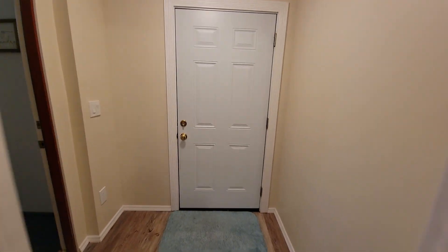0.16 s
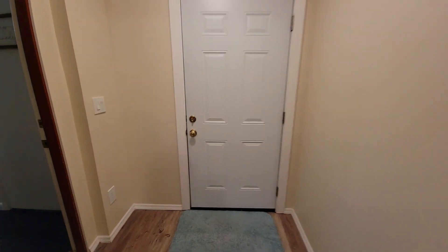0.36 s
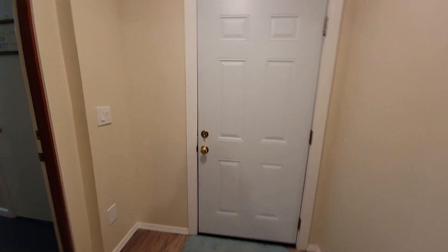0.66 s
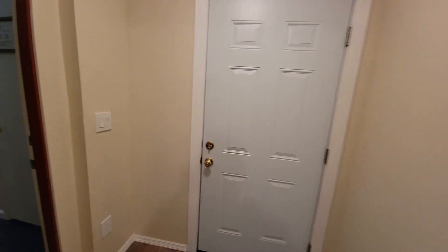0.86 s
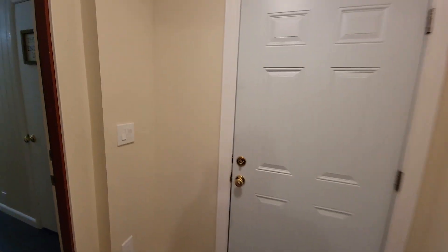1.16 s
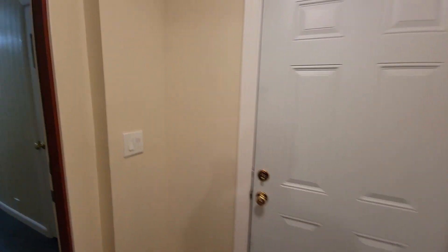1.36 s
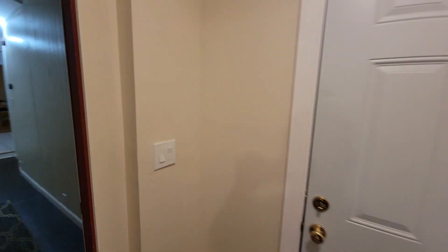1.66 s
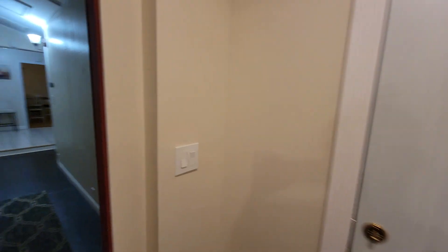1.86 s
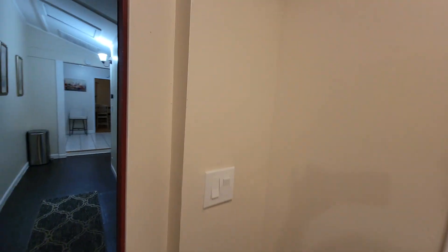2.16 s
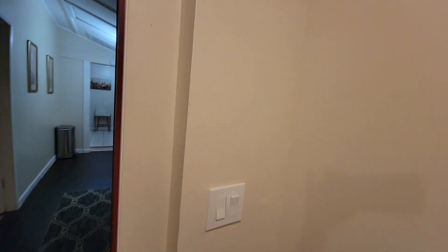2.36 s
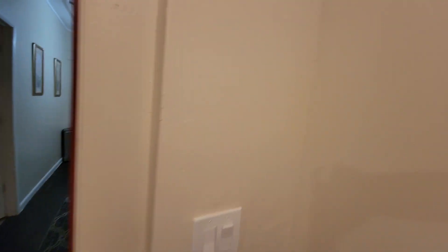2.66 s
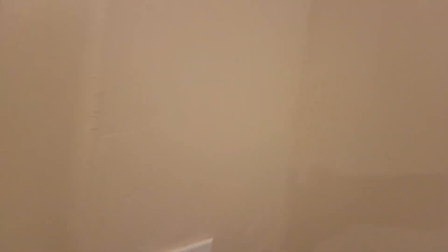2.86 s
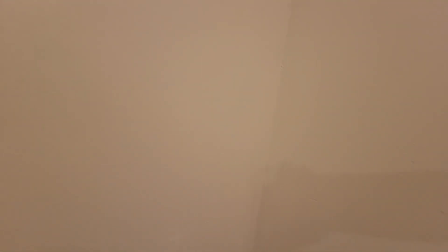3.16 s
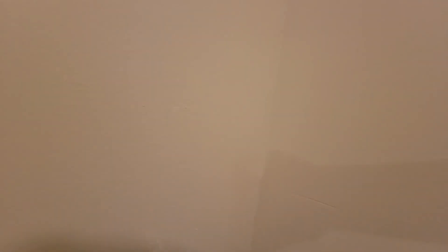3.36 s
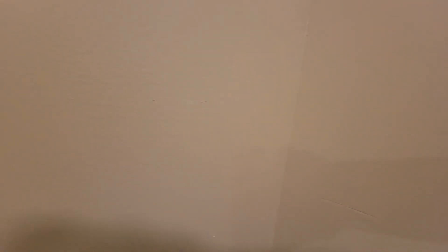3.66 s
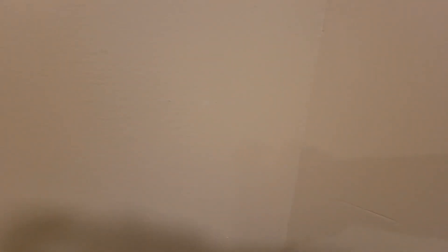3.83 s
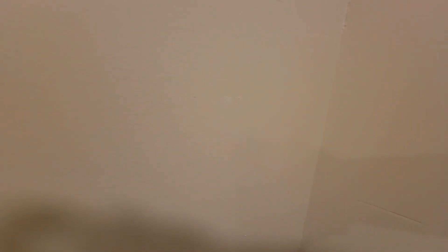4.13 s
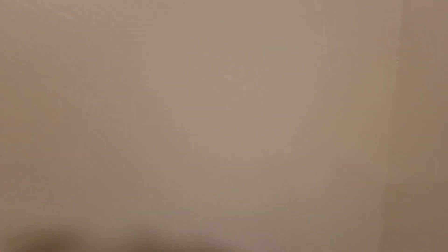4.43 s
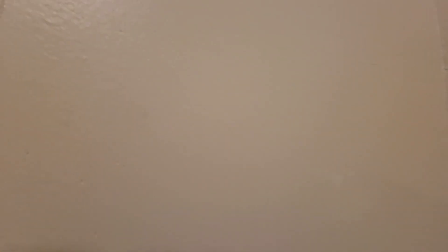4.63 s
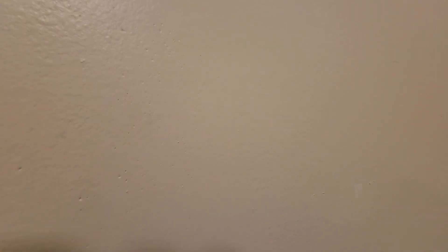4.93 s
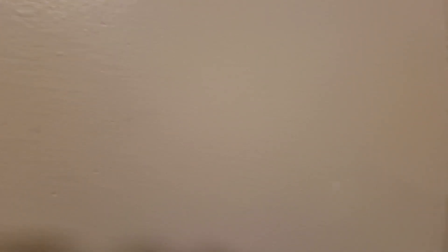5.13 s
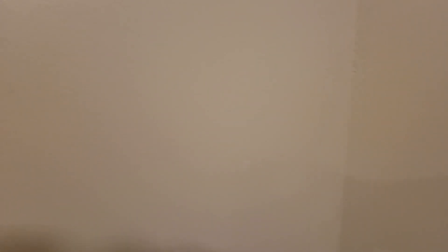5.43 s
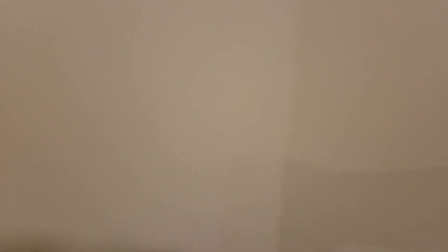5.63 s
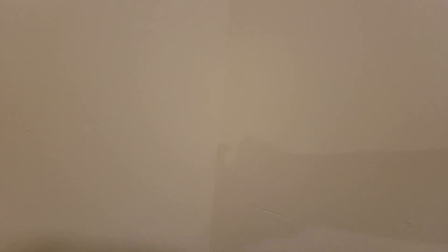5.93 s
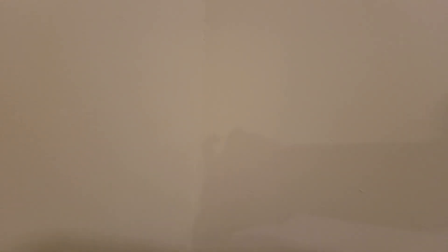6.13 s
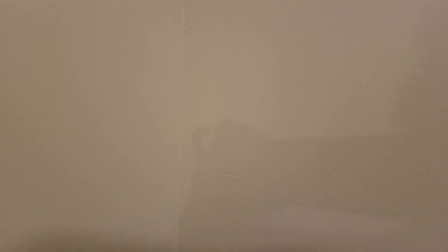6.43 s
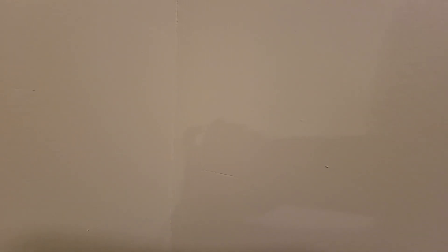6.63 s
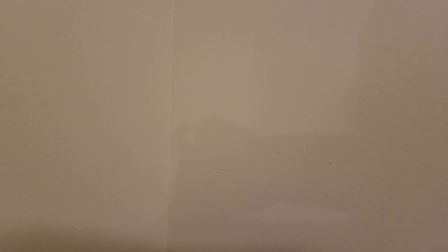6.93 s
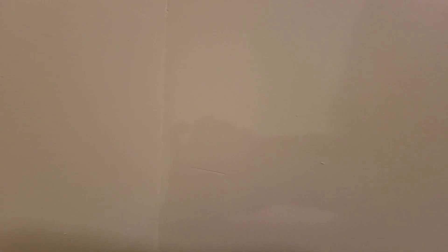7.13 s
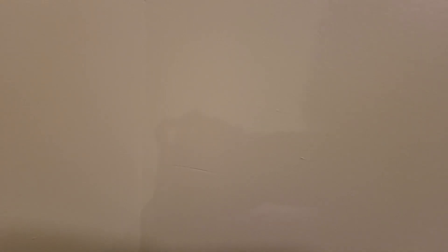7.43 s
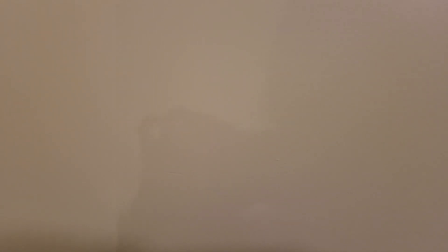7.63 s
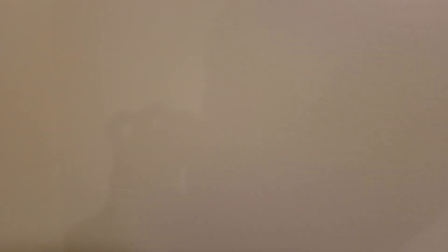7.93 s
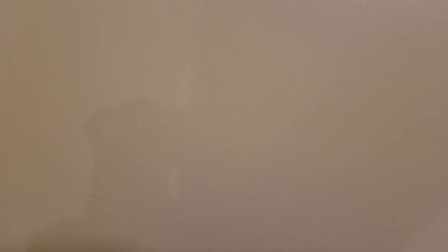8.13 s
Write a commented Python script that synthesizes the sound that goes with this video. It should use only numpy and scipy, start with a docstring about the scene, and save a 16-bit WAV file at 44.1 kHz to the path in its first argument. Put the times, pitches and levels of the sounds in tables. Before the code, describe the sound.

Soft footsteps cross a hard hallway floor, a hand wipes and taps the wall, a bolt snaps, a latch clicks, and a door bangs loudly.

```python
"""A quiet house hum runs throughout. Soft steps thud, pop and scuff over a hard floor in a small hallway,
as filtered noise and short sinking notes, while a hand taps and wipes the wall with dry cracks and grainy noise.
A sleeve brushes past, then a bolt snaps, a knob is knocked and a latch springs: noise cracks with ringing sines.
The door drags and snaps in its frame and bangs at the end with a boom of sines and a dying noise crack.
Two close microphone ports hear the lows alike, and higher sounds both directly and through the hall."""
import sys
import numpy as np
from scipy import signal
from scipy.io import wavfile

SR = 44100
rng = np.random.default_rng(int(sys.argv[2]) if len(sys.argv) > 2 else 0)


def volts_from_db(level):
    """Convert decibel levels to linear amplitude ratios."""
    exponent = np.asarray(level, float) / 20
    return 10 ** exponent


def waveform_to_disk(signal):
    """Save audio, clipped to [-1, 1], as 16-bit WAV at the path in sys.argv[1]."""
    frames = np.transpose(np.atleast_2d(signal))
    scaled = np.clip(frames, -1, 1) * 32767
    samples = np.round(scaled).astype(np.int16)
    wavfile.write(sys.argv[1], SR, samples)


N = 365588      # length in samples

# In the tables t60 is the time a sound takes to die by 60 dB.


def rms_one(x):
    """Scale a sound so that its average strength (rms) is 1."""
    return x / np.sqrt(np.mean(x ** 2) + 1e-20)


def at_hz(points, hz):
    """Read a table of (f/Hz, value) between its points, on a log-frequency axis."""
    table_hz, values = np.array(points).T[:2]
    return np.interp(np.log(hz), np.log(table_hz), values)


def in_time(rows):
    """Follow a curve of (t/s, level/dB) as a gain, practically silent outside its span."""
    s, level_db = np.transpose(rows)
    return volts_from_db(np.interp(np.arange(N) / SR, s, level_db, left=-140, right=-140))


def cut(x, hz, kind, order=2):
    """Keep only the lows, the highs or a band, with a smooth (Butterworth) filter."""
    return signal.sosfilt(signal.butter(order, hz, kind, fs=SR, output="sos"), x + 1e-18)


def ring(x, hz, t60):
    """Let each click start a dying sine, of height about 1 for a unit click."""
    decay = volts_from_db(-60 / (max(t60, 0.004) * SR))
    turn = 2 * np.pi * hz / SR
    return signal.lfilter([0, np.sin(turn)], [1, -2 * decay * np.cos(turn), decay * decay], x + 1e-18)


def body(x, resonances):
    """Colour a sound with side-by-side resonances (f/Hz, width/Hz, level/dB) of alternating sign."""
    out = 0
    for k, (hz, width, db) in enumerate(resonances):
        decay = np.exp(-np.pi * width / SR)
        pole = [1, -2 * decay * np.cos(2 * np.pi * hz / SR), decay * decay]
        gain = (-1) ** k * volts_from_db(db) * (1 - decay * decay) / 2
        out = out + gain * signal.lfilter([1, 0, -1], pole, x + 1e-18)
    return out


def diffuse(length, spectrum, t60=None):
    """Add half-octave bands of stereo noise, more alike in the bass; each band may die at its own pace."""
    # how alike left and right are: (f/Hz, likeness from 0 to 1)
    likeness = [(60, 0.88), (130, 0.7), (290, .3), (640, 0.29), (1400, 0.013), (16000, 0.066)]
    edges = 25 * 2 ** np.arange(0, 9.6, 0.5)      # band limits in Hz
    out, t = 0, np.arange(length) / SR
    white = rng.standard_normal((2, 2, length))
    for k, (low, high) in enumerate(zip(edges, edges[1:])):
        # neighbouring bands take turns with two noises
        mid, side = cut(white[k % 2], [low, high], "band")
        hz = np.sqrt(low * high)
        alike = np.clip(at_hz(likeness, hz), -1, 1)
        gain = volts_from_db(at_hz(spectrum, hz))
        if t60:
            gain = gain * volts_from_db(-60 * t / at_hz(t60, hz))
        out = out + gain * (np.sqrt(1 + alike) * mid + np.sqrt(1 - alike) * side * [[1], [-1]])
    return rms_one(out)


def train(times, sizes):
    """Place clicks of given sizes at given times in seconds."""
    out = np.zeros(np.shape(sizes)[:-1] + (N,))
    out[..., np.round(np.asarray(times) * SR).astype(int)] = sizes
    return out


def burst(clicks, t60):
    """Let each click start a puff of noise that dies fast."""
    fade = signal.lfilter([1], [1, -volts_from_db(-60 / (t60 * SR))], clicks + 1e-18)
    return fade * rng.standard_normal(N)


def flutter(rate):
    """Wobble at random, heading for a new value rate times a second."""
    step = SR / rate
    return np.interp(np.arange(N) / step, np.arange(N // 50), rng.standard_normal(N // 50))


def swells(peaks, rises, levels_db, fall):
    """Make gains that swell to a peak, then fall by so many dB a second."""
    swell_db = 11      # size of the rise
    out = np.zeros(N)
    for s, rise, db in np.broadcast(peaks, rises, levels_db):
        i = max(round((s - rise) * SR), 0)
        t = np.arange(i, min(i + SR, N)) / SR - s
        slope_db = np.where(t < 0, swell_db * t / max(rise, 0.001), -fall * t)
        out[i:i + SR] += volts_from_db(db + slope_db)
    return out


def swelling_notes(rows, swell_s):
    """Soft blows (t/s, level/dB, f/Hz, t60/s): each is a sine that swells briefly, then dies."""
    out, t = np.zeros(N), np.arange(SR // 2) / SR
    for s, db, hz, t60 in rows:
        i = round(s * SR)
        fade = (1 - np.exp(-t / swell_s)) * volts_from_db(-60 * t / max(t60, 0.008))
        note = fade * np.sin(2 * np.pi * hz * t)
        out[i:i + len(t)] += (volts_from_db(db) * note / np.abs(note).max())[:N - i]
    return out


def strokes(rows, fall, body_db):
    """Shape the gains of rub, body, grit and hiss for rubbing strokes; grit and hiss die faster."""
    treble_fall = 2.07      # times as fast
    s, rise, db, grit_db, hiss_db = np.transpose(rows)
    rub = swells(s, rise, db, fall)
    grit = swells(s, rise, db + grit_db, fall * treble_fall)
    hiss = swells(s, rise, db + hiss_db, fall * treble_fall)
    return np.array([rub, volts_from_db(body_db) * rub, grit, hiss])


def rubbing(gains, spread_db):
    """Friction: dense uneven grains of noise colour four ranges, called rub, body, grit and hiss."""
    # resonances of each range: (f/Hz, width/Hz, level/dB)
    rub_body = [(1065, 950, -3.5), (1715, 730, 2), (2064, 665, -2)]
    sole_body = [(370, 270, 1), (761, 530, -0.5)]
    grit_body = [(2778, 1300, 7), (4620, 2390, -3)]
    hiss_body = [(7500, 2600, 5.5), (11070, 1300, -16.5), (13600, 1800, -3)]
    grains = rng.standard_normal((4, N)) * volts_from_db(spread_db * np.minimum(rng.exponential(1, N), 4.0))
    grains *= volts_from_db(4.06 * flutter(45))      # the contact sticks and slips in clumps
    rub = rms_one(cut(body(grains[0], rub_body), [800, 2600], "band"))
    sole = rms_one(cut(body(grains[1], sole_body), 170, "high"))
    grit = rms_one(cut(body(grains[2], grit_body), 2300, "high"))
    hiss = rms_one(cut(body(grains[3], hiss_body), 5500, "high"))
    return np.sum(gains * [rub, sole, grit, hiss], axis=0)


def struck(events, crack_t60):
    """Blows as stereo puffs of noise: a middle part, and a treble part that leans to the right port."""
    s, db, treble_db, pan_db = np.transpose(events)[:4]
    sides = volts_from_db(np.outer([0.5, -0.5], np.clip(pan_db, -8, 8)))
    middle = burst(train(s, sides * volts_from_db(db)), crack_t60)
    treble = cut(burst(train(s, sides * volts_from_db(db + treble_db)), crack_t60), 4600, "high")
    return middle, treble * volts_from_db(np.array([[-2.5], [2.5]]))


def metal(events, modes, crack_db, crack_t60, loose, rattle_per_s):
    """Metal cracks and rings, each note struck with its own strength; loose parts make it flutter."""
    s, db, treble_db, pan_db, ring_db = np.transpose(events)
    middle, treble = struck(events, crack_t60)
    luck = rng.normal(0, 1.5, (len(s), len(modes))).T
    rings = 0
    for (hz, mode_db, t60), luck_db in zip(modes, luck):
        blow_db = db + ring_db + mode_db + luck_db
        if hz > 6000:
            blow_db = blow_db + treble_db
        note = ring(train(s, volts_from_db(blow_db)), hz, t60)
        rings = rings + (1 + loose * flutter(rattle_per_s)) * note
    return rings + volts_from_db(crack_db) * cut(middle, [500, 5000], "band") + treble


def late_left(x, lag):
    """Delay the left port by lag samples: it lies farther from the source."""
    x = np.broadcast_to(x, (2, N))
    return np.stack([np.roll(x[0], lag), x[1]])


def hum():
    """The quiet house hum is steady stereo noise, shaped band by band."""
    # colour of the hum: (f/Hz, level/dB)
    hum_colour = [(15, -32), (25, 6.5), (64, -5), (127, -10), (185, -26.5), (317, -12.5), (394, -19.5),
                  (624, -20.5), (1840, -23.5), (2760, -30), (6740, -30.5), (8140, -31.5), (14400, -35.5),
                  (16000, -21)]
    return volts_from_db(-64.5) * diffuse(N, hum_colour)


def hall(x):
    """Reflections build up within a few ms and die band by band."""
    # colour of the reflections: (f/Hz, level/dB)
    hall_colour = [(25, -17.5), (250, 0.5), (800, 0.5), (1400, 1), (2500, -1.5), (16000, -2)]
    # how long they last: (f/Hz, t60/s)
    hall_t60 = [(100, 0.47), (400, 0.43), (1500, 0.52), (4000, 0.53), (15000, 0.32)]
    length = int(0.8 * SR)
    tail = diffuse(length, hall_colour, hall_t60)
    tail *= 1 - np.exp(-np.arange(length) / (0.0013 * SR))
    tail /= np.sqrt(np.sum(tail ** 2) / 2)
    return signal.fftconvolve(x[None], tail)[:, :N]


def shake():
    """Jolts drive low resonances of floor and door; lumpy leaning keeps the slowest ones droning."""
    # weight jolting floor and door: (t/s, level/dB)
    jolt_rows = [(0.002, -53), (0.22, -61), (0.46, -47), (0.55, -45), (0.67, -54), (0.87, -61), (1.24, -44),
                 (1.3, -49), (1.41, -57), (2.07, -50), (2.16, -47), (2.76, -41.5), (2.85, -45.5),
                 (3.14, -56), (3.32, -79), (3.53, -55), (3.82, -38), (4.96, -53), (5.53, -58.5),
                 (5.71, -29), (6.05, -56), (6.401, -39.5), (6.59, -47.5), (6.77, -53), (7.08, -51),
                 (7.19, -42), (7.33, -43), (7.4, -52), (7.46, -40.5), (7.55, -45), (7.64, -38.5),
                 (7.75, -50), (7.82, -47), (7.91, -45.5)]
    # weight leaning on them between jolts: (t/s, level/dB)
    lean_curve = [(0.0, -88), (0.7, -64), (1.1, -80), (1.55, -78), (1.9, -90), (2.45, -72), (2.95, -64),
                  (3.7, -48), (4.0, -64), (4.9, -64.5), (5.3, -62.5), (5.62, -83.5), (5.8, -61.5),
                  (6.3, -53.5), (6.75, -61.5), (6.92, -77.5), (7.0, -58.5), (8.08, -57)]
    # resonances under the jolts, then under the leaning: (f/Hz, width/Hz, level/dB)
    shake_body = [(41, 25.1, -3), (94.8, 21.2, 0.5), (120, 34.4, -3), (189, 81.3, -11)]
    lean_body = [(44, 16, -0.5), (80, 34, -6), (115, 16, -2.5), (183, 70, -21.5)]
    s, db = np.transpose(jolt_rows)
    jolts = swells(s, 0.021, db, fall=294.5) * rms_one(body(rng.standard_normal(N), shake_body))
    lean = in_time(lean_curve) * volts_from_db(3.0 * flutter(18))
    return jolts + lean * rms_one(body(rng.standard_normal(N), lean_body))


def panel():
    """Shoves set the broad resonances of door panel and frame murmuring."""
    # shoves: (peak t/s, rise/s, level/dB)
    shoves = [(4.918, 0.011, -49), (5.039, 0.036, -45.5), (5.679, .004, -39.5), (6.156, 0.18, -62.5),
              (6.28, 0.031, -62.5), (6.394, 0.0084, -39), (7.082, 0.093, -57), (7.186, 0.041, -46.5),
              (7.316, 0.024, -62), (7.616, 0.093, -47), (7.75, .1, -59), (7.928, .05, -58),
              (8.07, 0.034, -51.5)]
    # resonances: (f/Hz, width/Hz, level/dB)
    panel_body = [(207, 46.5, -2), (270, 57, 0.5), (360, 86, -6.5), (390, 41, -2.5)]
    murmur = rms_one(cut(body(rng.standard_normal(N), panel_body), 180, "high"))
    return swells(*np.transpose(shoves), fall=124.5) * murmur


def walker():
    """Soles, hand and sleeve rub on floor, wall and cloth, which makes grainy noise."""
    # soles grazing the floor as they land: (peak t/s, rub level/dB, grit against rub/dB, hiss against rub/dB)
    graze_rows = [(0.447, -57.5, -10, -15), (1.217, -55, -10, -6), (1.283, -55, -14, -18),
                  (2.051, -55.5, -2.5, -5), (2.142, -50, -30, -16), (2.744, -54, -2, 2)]
    # soles sliding as they roll off:
    # (peak t/s, rise/s, rub level/dB, grit against rub/dB, hiss against rub/dB)
    slide_rows = [(0.002, 0.0032, -55, 0, -17), (0.549, 0.054, -52.5, -30, -18), (0.64, 0.062, -53, 3, -19),
                  (1.378, 0.017, -45.5, 7.5, -22), (1.42, 0.045, -50, -3, -11),
                  (2.238, 0.038, -55, 4.5, -20), (2.775, 0.031, -59, 3.5, 8.5)]
    # a hand wiping along the wall, same columns as the slides
    wipe_rows = [(2.94, 0.022, -53.5, -21, -26), (2.985, 0.035, -55.5, -14, -24),
                 (3.032, 0.0023, -40, -18, -27), (3.095, 0.077, -42.5, -12, -23),
                 (3.16, 0.11, -46.5, -24, -20), (3.39, .04, -62, -37, -29), (3.49, 0.093, -53.5, -13, -32),
                 (3.53, 0.04, -62, -1, -19), (3.657, 0.031, -46.5, -1.5, -10),
                 (3.735, 0.066, -55, -20, -30)]
    # a sleeve brushing past: (t/s, level/dB)
    sleeve_curve = [(4.2, -88), (4.25, -60.5), (4.335, -60), (4.52, -73), (4.885, -72.5), (4.9, -86)]
    graze_rows = np.insert(graze_rows, 1, 0.0084, axis=1)      # every graze rises in 8.4 ms
    grazes = strokes(graze_rows, fall=292, body_db=3.5)
    slides = strokes(slide_rows, fall=112.5, body_db=-2)
    wipes = strokes(wipe_rows, fall=155, body_db=-6.5)
    # the sleeve is mostly hiss: rub, body and grit stay below it
    sleeve = np.outer(volts_from_db(np.array([-14, -22.5, -8.5, 0])), in_time(sleeve_curve))
    return rubbing(grazes + slides + wipes + sleeve, spread_db=4.5)


def pops():
    """A flexing sole pops: a hollow note of a few cycles, with a sharp tick just after it starts."""
    # (t/s, note level/dB, f/Hz, tick against note/dB)
    pop_rows = [(0.21, -45.5, 398, -17), (0.469, -29.5, 417, -28), (0.508, -37.5, 458, -9.5),
                (0.532, -36, 430, -31), (0.553, -32, 427, -32), (0.587, -46.5, 283, 2),
                (0.592, -48.5, 283, 10.5), (0.605, -32, 440, -28.5), (0.624, -39, 382, -3),
                (0.666, -27.5, 370.6, -2), (0.699, -46, 331, -15), (1.211, -48.5, 550, -8),
                (1.279, -46.5, 517, -14), (2.05, -45.5, 288, -5), (2.137, -39, 544, -20),
                (2.741, -49, 390, 2), (2.801, -45, 390, -4)]
    s, db, hz, tick_db = np.transpose(pop_rows)
    note = swelling_notes(zip(s + 0.0011, db, hz, 5.8 / hz), swell_s=0.0016)
    tick = burst(train(s + 0.0034, volts_from_db(db + tick_db)), 0.0025)
    coloured_tick = body(tick, [(1900, 1900, 0), (3120, 1360, 0)])
    return note + cut(tick, 5000, "high") + volts_from_db(16.5) * coloured_tick


def thuds():
    """Heels and shoves give soft low blows; each first pulls the pressure down."""
    # (t/s, level/dB, f/Hz, t60/s)
    thud_rows = [(0.207, -52.5, 116, 0.092), (0.469, -46, 100, 0.092), (0.52, -53, 43.1, 0.105),
                 (0.544, -37, 112, 0.21), (0.671, -42, 168, 0.075), (0.769, -50, 122.6, 0.13),
                 (1.218, -40, 128, 0.09), (1.28, -45, 124, 0.09), (2.049, -34, 59.7, 0.27),
                 (2.119, -33.5, 59.4, 0.4), (2.153, -35, 70.8, 0.27), (2.354, -40.5, 54.7, 0.23),
                 (2.743, -40.5, 71, 0.14), (2.8, -31, 63.8, 0.096), (3.509, -45, 162, 0.095),
                 (3.788, -34, 45, 0.23), (4.952, -43.5, 132, 0.27), (5.677, -28.5, 219, 0.064),
                 (5.686, -21.5, 93, 0.07), (5.709, -39, 75.4, 0.085), (5.76, -32, 72.7, 0.072),
                 (6.039, -46, 92, 0.13), (6.197, -48, 86.1, 0.17), (6.381, -35, 133, 0.16),
                 (7.08, -41, 166, 0.16), (7.181, -39, 132, 0.13), (7.299, -42.5, 112.7, 0.193),
                 (7.456, -31.5, 40.4, 0.07), (7.548, -33, 102, 0.11), (7.599, -33.5, 99.6, 0.096),
                 (7.638, -43, 121, 0.16)]
    return -swelling_notes(thud_rows, swell_s=0.002)


def taps():
    """Hand and switch tap the wall: short cracks through broad resonances of plastic and board."""
    # (t/s, level/dB, treble against level/dB, left against right/dB)
    tap_rows = [(1.377, -32, -36, 2), (2.933, -50.5, -24, 9), (2.974, -39.5, -50, 7), (3.03, -49, -17, 5),
                (3.388, -55.5, -27.5, -2.5), (3.466, -44.5, -33, -1), (3.505, -38.5, -40, 8),
                (3.631, -45, -2, 2.5), (3.653, -33.5, -10, 8.5), (3.744, -19, -21.5, 8),
                (3.757, -23.5, -20, 4.5), (3.791, -14, -13, 3.5), (3.805, -18.5, -15.5, -6)]
    # resonances: (f/Hz, width/Hz, level/dB)
    tap_body = [(474, 430, -11.5), (936, 330, -3), (1500, 510, 0.5), (2250, 990, -4), (3180, 1640, -6.5)]
    middle, treble = struck(tap_rows, crack_t60=0.048)
    return volts_from_db(6) * body(middle, tap_body) + volts_from_db(-5) * treble


def bolt():
    """The bolt snaps: a crack that sets its metal ringing, with a slight rattle."""
    # (t/s, level/dB, treble against level/dB, left against right/dB, ring against level/dB)
    bolt_rows = [(4.963, -48, -18, -4, -10), (5.01, -18.5, 0, 10, -11)]
    # ringing notes: (f/Hz, level/dB, t60/s)
    bolt_modes = [(470, -14, 0.24), (793, 4, 0.07), (817, -2.5, 0.074), (1940, -12, 0.049),
                  (1967, 5.5, 0.045), (3317, 4.5, 0.032), (3397, -5.5, 0.15), (4370, -12, 0.08),
                  (1210, -8, 0.063), (13360, -6, .02), (1957, -17, 0.27)]
    return metal(bolt_rows, bolt_modes, crack_db=2.5, crack_t60=0.036, loose=0.7, rattle_per_s=150)


def knob():
    """The knob is knocked and turned: its loose metal rings with a fast, strong rattle."""
    # (t/s, level/dB, treble against level/dB, left against right/dB, ring against level/dB)
    knob_rows = [(5.702, -31.5, -7.5, 2, -12.5), (5.714, -34.5, -13.5, -4.5, -12.5)]
    # ringing notes: (f/Hz, level/dB, t60/s)
    knob_modes = [(1262, 1.5, 0.035), (2900, -7, 0.085), (3500, 2, 0.054), (3800, -3, 0.087),
                  (4044, 8.5, .1), (5440, -5.5, 0.35), (5470, -9.5, 0.16), (5720, -7.5, .2),
                  (7827, -2, 0.06), (13350, 8, 0.042)]
    return metal(knob_rows, knob_modes, crack_db=4.0, crack_t60=0.0335, loose=2.44, rattle_per_s=450)


def latch():
    """The latch tongue springs: a crack and rings that rattle."""
    # (t/s, level/dB, treble against level/dB, left against right/dB, ring against level/dB)
    latch_rows = [(6.391, -38.5, -21, 8, -8), (6.968, -59, -1.5, 6.5, -6.5)]
    # ringing notes: (f/Hz, level/dB, t60/s)
    latch_modes = [(620, -11, 0.055), (838, 4, 0.073), (1116, 11, 0.062), (1430, 5.5, 0.061),
                   (1810, -1, 0.073), (5290, -6, 0.28)]
    return metal(latch_rows, latch_modes, crack_db=5.5, crack_t60=0.057, loose=1.8, rattle_per_s=300)


def seal():
    """The door seal drags in the frame, which makes grainy friction noise."""
    # (peak t/s, rise/s, rub level/dB, grit against rub/dB, hiss against rub/dB)
    drag_rows = [(5.93, .04, -67.5, 0, -5), (6.126, .008, -66, -5, -15), (7.053, .003, -50.5, -6, 3),
                 (7.105, .002, -46, -21, -30), (7.182, 0.011, -52.5, -20, -11),
                 (7.26, 0.041, -76, -20, -22), (7.61, 0.042, -46, -13, -22), (7.68, .06, -62, -15, -20),
                 (7.76, .08, -65, -15, -22), (7.84, 0.068, -62, -9, -18), (7.9, 0.024, -57, 0, -12),
                 (7.94, 0.046, -60, -5.5, -7), (8.08, 0.047, -47.5, -6, -14)]
    return rubbing(strokes(drag_rows, fall=213, body_db=-3), spread_db=6.5)


def snaps():
    """Door edge and fittings snap in the frame: dry cracks, each with a broad colour of its own."""
    # (t/s, level/dB, treble against level/dB, left against right/dB, centre f/Hz)
    snap_rows = [(4.912, -36.5, -25, 5.5, 2060), (6.034, -52, -11, 8, 2200), (6.122, -48.5, -16.5, 8, 3230),
                 (7.051, -37, -2.5, -10, 1940), (7.103, -31.5, -28, 8, 1450), (7.139, -48, -5.5, 5, 1630),
                 (7.174, -36, -2.5, -1, 1550), (7.379, -47, -7.5, 4, 1700), (7.453, -45.5, -12, 7, 3520),
                 (7.569, -37.5, -14, 3, 3440), (7.602, -33, -23, 9, 1500), (7.634, -26.5, -12.5, 10, 1900),
                 (7.907, -43.5, -3, 3, 2950), (8.046, -36, -25, 1, 2800)]
    middle, treble = struck(snap_rows, crack_t60=0.04)
    starts = [round(row[0] * SR) for row in snap_rows] + [N]
    out = volts_from_db(-3) * treble
    for row, i, j in zip(snap_rows, starts, starts[1:]):
        centre = row[4]
        out[:, i:j] += volts_from_db(3) * cut(middle[:, i:j], [centre / 1.6, centre * 1.6], "band")
    return out


def bang():
    """The door panel booms; countless small modes of door and frame die band by band, as noise."""
    # door meets frame: (t/s, level/dB)
    bang_rows = [(8.087, 0.5), (8.096, 1.5)]
    # booming notes of the panel: (f/Hz, level/dB, t60/s)
    door_modes = [(43.2, -5, 0.61), (64.8, -32, 0.41), (86.1, 3.5, 0.52), (132, -22, 0.3),
                  (155.6, -7.5, 0.21), (181, -4, 0.23), (207, -2, 0.17), (246.8, -9, 0.28),
                  (398, -23, 0.61), (458, -20, 0.62), (524, -7.5, 0.091)]
    # colour of the crack: (f/Hz, level/dB)
    crack_colour = [(71, -39), (120, -2), (231, -10.5), (362, -14), (524, -21), (874, -24.5), (1750, -15),
                    (2200, -27.5), (2810, -26), (5990, -36.5), (16000, -48.5)]
    # how long the crack lasts: (f/Hz, t60/s)
    crack_t60 = [(150, 0.28), (500, 0.27), (2000, 0.11), (12000, .12)]
    s, db = np.transpose(bang_rows)
    rebound = (-1) ** np.arange(len(s))      # the panel swings back after the edge lands
    blows = cut(train(s, rebound * volts_from_db(db)), 760, "low")
    boom = sum(volts_from_db(level_db - 12.5) * ring(blows, hz, t60) for hz, level_db, t60 in door_modes)
    crack = np.zeros((2, N))
    for start, level_db in bang_rows:
        i = round(start * SR)
        crack[:, i:] += volts_from_db(level_db - 25.0) * diffuse(N - i, crack_colour, crack_t60)
    return boom, crack


def scene():
    """Lows reach both ports alike; higher sounds come direct and through the hall."""
    boom, crack = bang()
    lows = thuds() + shake() + boom
    rubs = walker() + seal()
    lock = bolt() + knob() + latch()      # close to the ports, so drier
    wall = taps()
    hits = snaps() + crack
    near = pops() + panel()

    wall_middle = cut(wall.mean(axis=0), [600, 3000], "band", order=1)
    to_hall = volts_from_db(-2.5) * rubs + volts_from_db(-4.5) * hits.mean(axis=0) + volts_from_db(-3.0) * wall_middle
    to_hall = to_hall + volts_from_db(-7) * lock.mean(axis=0) + volts_from_db(-15.5) * near + volts_from_db(-9.5) * lows
    wet = hall(to_hall)
    direct = late_left(volts_from_db(-4) * rubs + hits + wall + lock, lag=16)
    return lows + near + direct + wet + hum()


def band_limit(x):
    """A steep low-pass at the top of the band."""
    return signal.sosfilt(signal.butter(12, 16820, fs=SR, output="sos"), x)


def record(dry):
    """The microphone drops the deepest bass and the very top, and loud peaks are rounded."""
    heard = cut(cut(dry, 30, "high"), 16300, "low", order=16)
    rounded = 0.89 * np.tanh(heard / 0.92)
    return band_limit(rounded)


dry = scene()
out = record(dry)
waveform_to_disk(out)
```